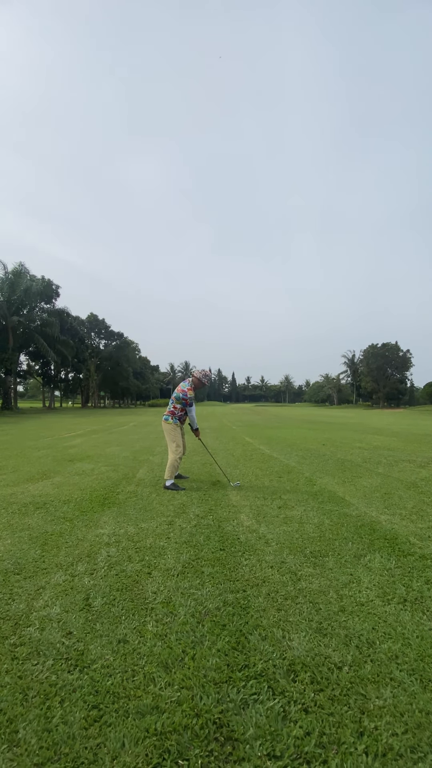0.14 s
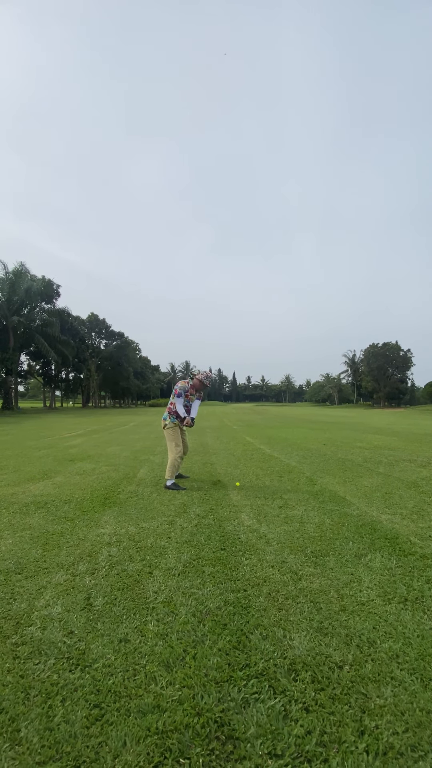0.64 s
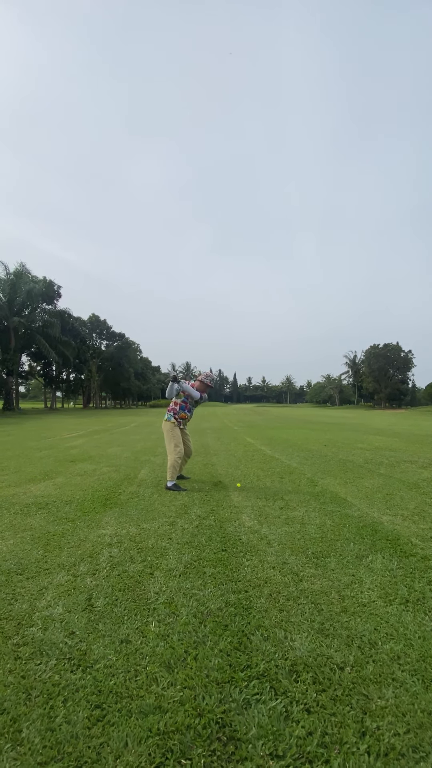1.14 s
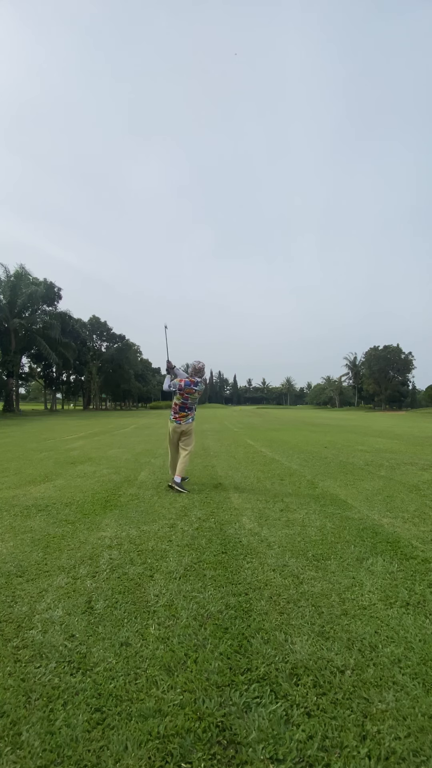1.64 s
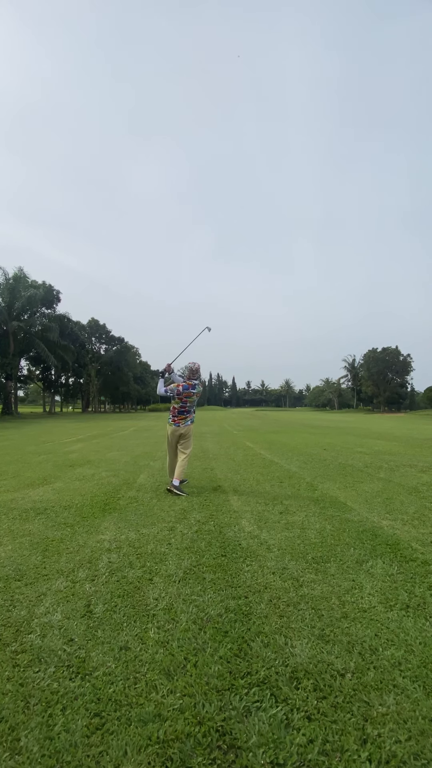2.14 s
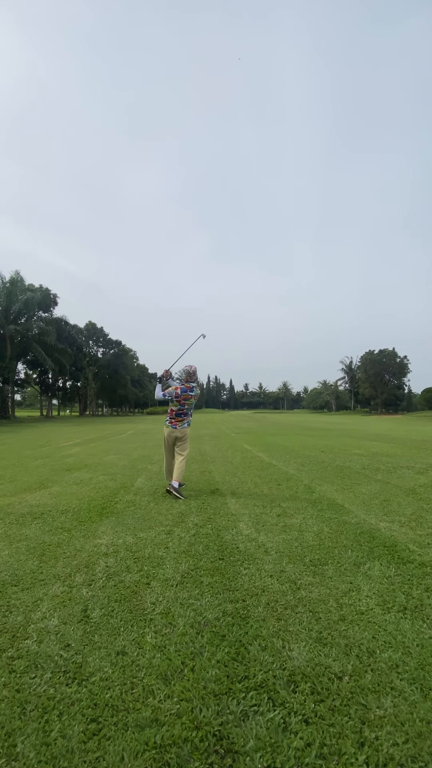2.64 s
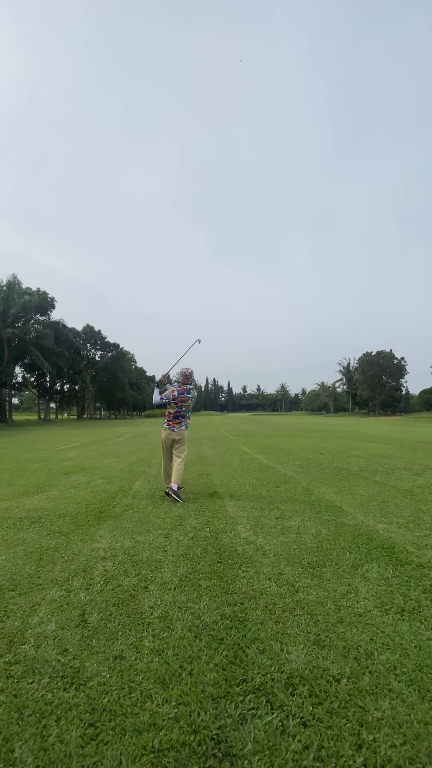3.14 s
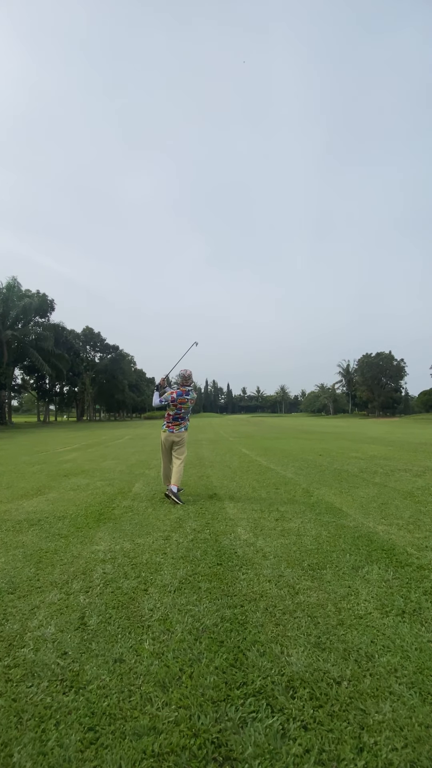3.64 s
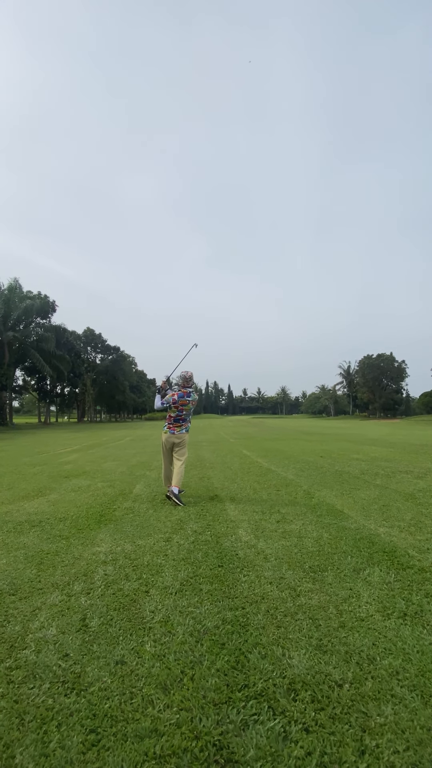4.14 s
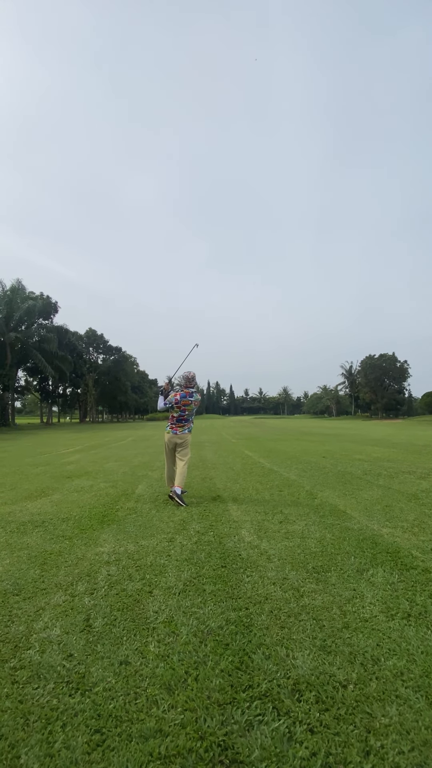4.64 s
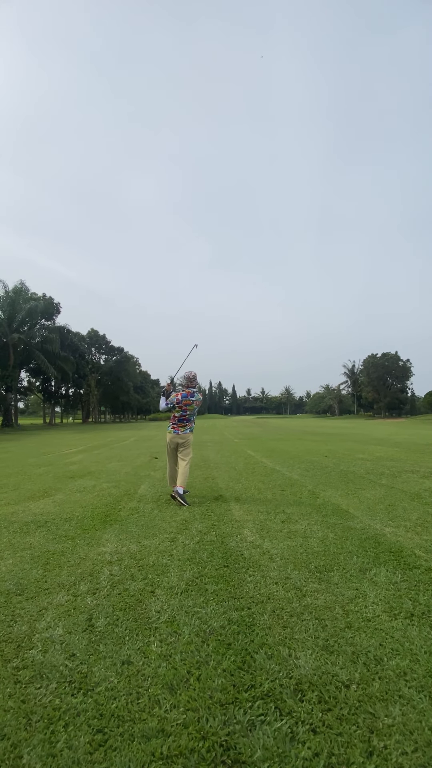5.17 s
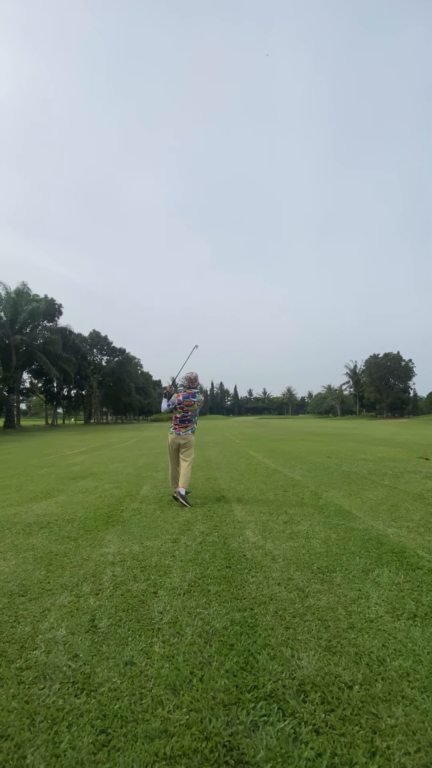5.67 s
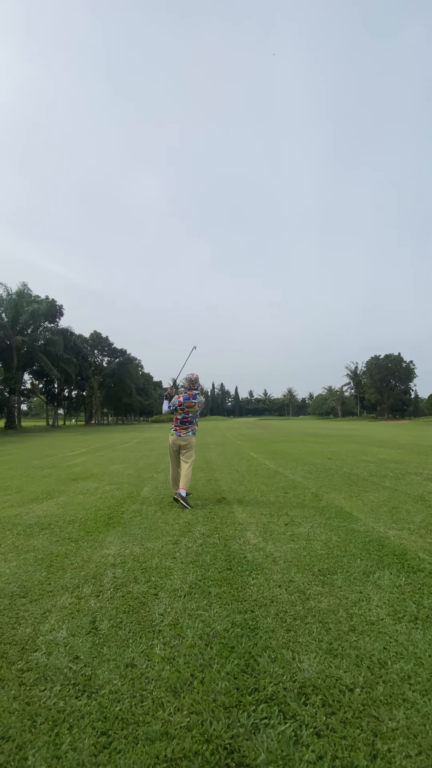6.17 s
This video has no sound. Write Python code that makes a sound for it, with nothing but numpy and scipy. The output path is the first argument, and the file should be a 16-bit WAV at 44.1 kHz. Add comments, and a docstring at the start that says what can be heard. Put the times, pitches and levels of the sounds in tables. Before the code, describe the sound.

On an open fairway, low rumble, distant engine drone and soft leaf and insect hiss run throughout, with tiny buzzy bird chips. At about 1.4 seconds a very brief swish ends in one sharp, loud iron strike on a ball with a crunch of tearing turf and a faint scattered return. Whistling birds answer on the right, then sparse peeps and chips continue. Stereo microphone some metres behind the golfer.

```python
"""An iron strikes a golf ball on an open fairway, some metres ahead of a two-port microphone:
clicks set the modes of club and ball ringing, and dense noise grains are the tearing turf.
Shaped noise makes the swish before the ball and the scattered return of turf spray and tree line.
Near-sine notes with noisy echoes are the strike's short ring and whistling, peeping and chipping birds.
Filtered noise gives leaf hiss, cicadas, crickets, a thin top hiss, far engine drone, rumble and road wash."""
import sys
import numpy as np
from scipy import signal
from scipy.fft import rfft, irfft, next_fast_len
from scipy.io import wavfile
from scipy.ndimage import uniform_filter1d, map_coordinates

SR = 44100
rng = np.random.default_rng(int(sys.argv[2]) if len(sys.argv) > 2 else 0)


def gain_from_db(level_db):
    """Turn a decibel level (scalar or array-like) into a linear amplitude factor."""
    decades = np.asarray(level_db, float) / 20
    return 10 ** decades


def persist_wave(psi):
    """Save psi, clipped to +-1, as 16-bit WAV."""
    counts = np.round(np.clip(psi, -1, 1) * 32767).astype(np.int16)
    wavfile.write(sys.argv[1], SR, np.atleast_2d(counts).T)


N = 277220   # samples
SIZE = next_fast_len(N + 8192)   # transform length, samples
FREQS = np.maximum(np.arange(SIZE // 2 + 1) * SR / SIZE, 1)   # Hz


# club contacts, grass tips, turf, ball (fourth row), rebounds: [t/s, relative level/dB, softness f/Hz]
IMPACTS = [(1.3950, -25, 8920), (1.401, -15.5, 493.3), (1.4017, -17.5, 6996), (1.4030, -7, 14000),
           (1.4039, -13.5, 2490), (1.4047, -14.5, 1502), (1.4071, -21.5, 9010), (1.4086, -27.5, 12010),
           (1.4112, -29, 13980)]


def contact_force():
    """Contact mechanics: a softer contact spreads its impulse into a slower exponential decay."""
    force = np.zeros(N) + 1e-18
    for s, db, soft_hz in IMPACTS:
        r = np.exp(-2 * np.pi * soft_hz / SR)
        at = round(s * SR)
        force[at:at + 200] += gain_from_db(db) * (1 - r) * r ** np.arange(200)
    return force


# modes of head, shaft and ball: [f/Hz, relative level/dB, 60 dB decay t/s]
CLUB_MODES = [(585, -21, 0.04), (820, -16, .04), (1150, -10.5, .018), (1630, -11, .014), (1950, -21, 0.022),
              (2470, -22.5, 0.013), (2950, -13, 0.018), (3950, -6, .012), (4250, -11, 0.014),
              (4638, -12.5, .013), (4920, -18, .03), (5400, -10, 0.012), (5970, -12.5, 0.0086),
              (7290, -8.5, .012), (8360, -10.5, 0.0053), (9300, -5.5, .008), (11200, -5, .008),
              (13900, -16, 0.0065)]
# sign of each mode; neighbours that move the same way leave a gap between them: [+1 or -1]
MODE_SIGNS = [1, 1, 1, 1, -1, -1, 1, 1, -1, 1, -1, 1, -1, 1, -1, 1, -1, 1]
# modes of the sole meeting the ground: [f/Hz, relative level/dB, 60 dB decay t/s]
GROUND_MODES = [(190, -27, .06), (325, -22.5, 0.065)]


def struck_bodies(force):
    """Modal synthesis: an impulse excites each damped mode, and the modes superpose."""
    out = gain_from_db(-5.5) * np.diff(force, prepend=0)   # direct click
    for (hz, db, t60), sign in zip(CLUB_MODES, MODE_SIGNS):
        out = out + sign * ring(force, hz, db, t60)
    # a small head radiates no bass
    out = signal.sosfilt(signal.butter(4, 450, "high", fs=SR, output="sos"), out)
    return out + sum(ring(force, hz, db, t60) for hz, db, t60 in GROUND_MODES)


# spectrum of tearing turf: [f/Hz, relative level/dB per Hz]
TURF_SPECTRUM = [(400, -23.5), (1200, -7.5), (2500, -9.5), (5000, -1), (6500, -10), (9500, 1.5),
                 (12500, -3.5), (15500, -5.5), (16800, -24.5)]


def turf_tear():
    """Granular noise: uneven random impulses, coloured, are gated by a brief swell; three spectra."""
    grain_db = 2.4 * rng.exponential(1, (3, SIZE))
    grains = rng.standard_normal((3, SIZE)) * gain_from_db(grain_db)
    coloured = irfft(rfft(grains) * colour(TURF_SPECTRUM), SIZE)[:, :N]
    coloured = np.array([rms_one(g) for g in coloured])
    envelope = gain_from_db(swell(top_s=1.4012, hold_s=.005, db=-20, rise_db=7000, fall_db=2000))
    return rfft(coloured * envelope, SIZE)


def strike():
    """Superposition: ringing bodies and tearing turf reach the ports from straight ahead."""
    bodies = struck_bodies(contact_force())
    tear = turf_tear()
    return ports(rfft(bodies, SIZE) + tear[0], AHEAD_PORTS, tear[1:])


# spectrum of swish and scatter before tilt: [f/Hz, relative level/dB per Hz]
SWING_SPECTRUM = [(250, -30), (400, 1.5), (1000, 3.5), (3000, 9), (5000, 5), (6300, 5.5), (8000, -2),
                  (8900, -16), (11500, -18), (13500, -10), (16000, -22)]


def swing():
    """Aerodynamic noise and diffuse scattering: a brightening swish, then lumpy noise, band by band."""
    # air round the shaft, at full level just before the ball
    swish_start_s, swish_hold_s = 1.358, .042
    swish_db = swell(swish_start_s, swish_hold_s, db=-43, rise_db=300, fall_db=450)
    # turf spray and the tree line's return
    scatter_db = swell(top_s=1.50, hold_s=.11, db=-54.5, rise_db=110, fall_db=75)
    # dB per octave about 700 Hz: -4.3 as the hold ends, growing by 60 each second within the limits
    since_hold_s = np.arange(N) / SR - swish_start_s - swish_hold_s
    swish_tilt = np.clip(-4.3 + 60 * since_hold_s, -12, 0)
    scatter_tilt, patchy_db = -0.66, 2.8   # dB per octave; spread of the lumps, dB
    air = rfft(diffuse(colour(SWING_SPECTRUM), AHEAD_PORTS), SIZE)
    spray = rfft(diffuse(colour(SWING_SPECTRUM)), SIZE)
    edges_hz = [200, 700, 1400, 2400, 3600, 5200, 7000, 10000, 17000]
    out = 0
    for low, high in zip(edges_hz, edges_hz[1:]):
        band = (FREQS >= low) * (FREQS < high)
        octaves = np.log2(np.sqrt(low * high) / 700)
        air_band = irfft(air * band, SIZE)[:, :N]
        out = out + air_band * gain_from_db(swish_db + swish_tilt * octaves)
        lumps_db = patchy_db * drift(45)
        spray_band = irfft(spray * band, SIZE)[:, :N]
        out = out + spray_band * gain_from_db(scatter_db + scatter_tilt * (octaves - 0.5) + lumps_db)
    return out


# whistled notes, one row a note; the first row is the strike's short ring near 2.8 kHz:
# [level before port gains/dB, pitch line of (t/s, f/Hz)]
WHISTLE_NOTES = [ (-62, [(1.412, 2830), (1.435, 2870)]), (-62, [(1.443, 3780), (1.455, 3700),
                 (1.47, 3320)]), (-57.5, [(1.48, 2780), (1.515, 2780)]), (-64, [(1.525, 2880),
                 (1.545, 2400)]), (-53.5, [(1.708, 2870), (1.722, 3140), (1.735, 3060), (1.742, 3320),
                 (1.764, 3230)]), (-58.5, [(1.805, 3880), (1.815, 3970), (1.83, 3230), (1.841, 3150)]),
                 (-56.5, [(1.845, 2940), (1.875, 2835), (1.89, 3070), (1.912, 2470)]), (-65, [(2.005, 3320),
                 (2.03, 3390), (2.047, 3640)]), (-68, [(2.03, 3850), (2.058, 3920)]), (-57, [(2.098, 2780),
                 (2.115, 2886), (2.135, 2940), (2.15, 3400), (2.165, 3010), (2.183, 2745), (2.195, 3100),
                 (2.213, 2970)]), (-74.5, [(2.99, 2990), (3.005, 3500), (3.04, 3400)]),
                 (-74.5, [(3.055, 3300), (3.08, 2900), (3.105, 2700)]), (-70.5, [(3.085, 3410),
                 (3.13, 3380)]), (-74.5, [(3.115, 2720), (3.165, 2700)]), (-71, [(3.29, 2830),
                 (3.335, 3140)]), (-76, [(3.285, 4130), (3.33, 4070)]), (-77, [(3.36, 3420), (3.41, 3200)]),
                 (-68.5, [(3.40, 2700), (3.46, 2720)]), (-75.5, [(3.66, 4150), (3.69, 3940)]),
                 (-76.5, [(3.75, 3910), (3.79, 3300)]), (-80, [(3.335, 3930), (3.38, 3480)]),
                 (-80.5, [(3.74, 6350), (3.85, 5950)]), (-72, [(4.638, 4650), (4.668, 3840)]),
                 (-69.5, [(4.718, 3110), (4.728, 3470), (4.748, 3750), (4.76, 3670)]),
                 (-66.5, [(4.762, 4255), (4.795, 3570)]), (-72, [(4.797, 3710), (4.815, 3770),
                 (4.835, 3550)]), (-77, [(5.625, 4750), (5.665, 3850)]), (-72, [(5.755, 3630), (5.77, 3370),
                 (5.782, 3530)]), (-81, [(5.78, 4030), (5.812, 4120)]), (-86, [(5.795, 6250), (5.83, 6450),
                 (5.85, 6400)]), (-74.5, [(6.105, 3100), (6.13, 2640)]), (-87, [(5.94, 6290), (5.97, 6140),
                 (6.04, 5980)]), (-74.5, [(6.25, 3790), (6.282, 3900)]), ]


def whistles():
    """Frequency modulation: gliding near-sines from the right, wetter and rougher when faint."""
    near_db = -55.5   # reference level for echo and roughness
    direct, sent = np.zeros((2, N))
    for db, line in WHISTLE_NOTES:
        s = np.linspace(line[0][0], line[-1][0], num=60)
        hz = np.interp(s, *np.transpose(line))
        level_db = db - np.linspace(-1.4, 1, num=60) ** 4   # softer at its ends, softest at its start, loudest a little past the middle
        fainter_db = near_db - db
        note = np.zeros(N)
        add(note, np.transpose([s, hz, level_db]), rough=min(2 + .3 * fainter_db, 4.5))
        direct += note
        sent += note * gain_from_db(min(.75 * fainter_db, 12))
    return direct * gain_from_db([[-8.0], [2.5]]) + echoes(sent, wet_db=-13, t60=0.25)


# arched peeps: [t of the top/s, top f/Hz, top level before flutter and port gains/dB]
PEEP_NOTES = [(.385, 5660, -69.5), (3.205, 5530, -71), (4.148, 5780, -64), (5.18, 5700, -74),
              (6.114, 5530, -70)]


def peeps():
    """Frequency modulation: pitch and level follow a parabolic arch."""
    half_s, sag, edge_db = .019, .11, 1   # half length, share of pitch and level lost at both ends
    calls = np.zeros(N)
    arch = np.linspace(-1, 1, num=30)
    for s, hz, db in PEEP_NOTES:
        rows = [s + half_s * arch, hz * (1 - sag * arch ** 2), db - edge_db * arch ** 2]
        add(calls, np.transpose(rows), rough=1.7)
    return ports(rfft(calls, SIZE), AHEAD_PORTS) + echoes(calls, wet_db=-13, t60=.15)


# buzzy chips, each begun 6 ms before its time: [t/s, reference level before the envelope/dB]
CHIP_NOTES = [(0.0094, -63), (0.084, -59.5), (0.3093, -62), (0.3596, -63.5), (0.655, -59), (0.838, -56.5),
              (1.037, -62), (1.8386, -64), (2.3072, -65), (2.688, -55.5), (2.8945, -63), (3.0285, -64),
              (3.3603, -64), (4.2194, -71), (4.5083, -70), (4.596, -57), (4.874, -61.5), (5.116, -59.5),
              (5.333, -63.5), (5.4974, -66), (5.6894, -67), (6.1823, -69)]


def chips():
    """Fast frequency modulation: an uneven trill swings the pitch as the chip rises."""
    calls = np.zeros(N)
    steps = np.linspace(0, 1, 120)
    chances = rng.random((len(CHIP_NOTES), 5))
    for (s, db), (speed, turn, long, high, top) in zip(CHIP_NOTES, chances):
        length_s = .028 * (1 + .3 * (2 * long - 1))
        trill_hz = 260 * (.9 + 0.17 * speed)
        uneven = .5 * smooth_chance(size=12)[:120]   # rad
        trill = np.sin(2 * np.pi * (trill_hz * length_s * steps + turn) + uneven)
        middle_hz = 6700 + 250 * (2 * high - 1)
        hz = middle_hz + 950 * trill + 700 * (steps - .5)
        # the upper turn of the trill is louder by this much, the lower one softer
        top_db = np.interp(top, [0, 1], (2.0, 6.0))
        level_db = db - 8 + top_db * trill - 25 * (steps - .45) ** 2
        add(calls, np.transpose([s - .006 + length_s * steps, hz, level_db]), rough=4.0)
    return ports(rfft(calls, SIZE), AHEAD_PORTS) + echoes(calls, wet_db=-6, t60=.22)


# spectrum of leaf hiss: [f/Hz, relative level/dB per Hz]
LEAF_SPECTRUM = [(1000, -29.5), (1700, -1), (2150, -0.5), (2530, 1.5), (4220, -6.5), (5990, -11),
                 (7720, -18), (8210, -17), (8800, -7.5), (11400, -35), (19400, -120)]


def leaves():
    """Broadband noise: steady leaf hiss, raised once by a far twitter of birds."""
    twitter_db = swell(top_s=3.7, hold_s=0.078, db=2.5, rise_db=9, fall_db=4.7)
    return wavering(LEAF_SPECTRUM, -66.5 + np.maximum(twitter_db, 0), flicker_db=0.45)


# spectrum of cicadas: [f/Hz, relative level/dB per Hz]
CICADA_SPECTRUM = [(4880, -41.5), (8300, -13.5), (9060, 2), (9590, -0.5), (10300, 3), (11000, -24),
                   (14300, -53), (22000, -120)]


def cicadas():
    """Band-shaped noise: a chorus is heard as a high band that wavers."""
    return wavering(CICADA_SPECTRUM, -68, flicker_db=0.91)


def crickets():
    """Resonance: a broad resonance blurs noise into a steady band."""
    return resonant_noise(2520, width=440, db=-77.5)


# spectrum of the thin top hiss: [f/Hz, relative level/dB per Hz]
TOP_SPECTRUM = [(10000, -27.5), (11000, 2.5), (13000, -6.5), (15000, -16), (16000, -42)]


def top_hiss():
    """Band-shaped noise: a thin top band flickers strongly and fades away late."""
    return wavering(TOP_SPECTRUM, swell(top_s=0, hold_s=4.5, db=-82, rise_db=60, fall_db=24), flicker_db=7.1)


# wavering partials of a far engine: [f/Hz, half-gain width f/Hz, rms level/dB]
ENGINE_PARTIALS = [(69.47, 2.6, -47), (135.9, 3.9, -52), (220.4, 18, -62)]


def engine():
    """Resonance: noise through narrow resonances gives tones that swell and waver."""
    return sum(resonant_noise(hz, width, db) for hz, width, db in ENGINE_PARTIALS)


# levels of the low rumble and road wash, which waver at random:
# [t/s, rumble level before flicker/dB, road wash level before flicker/dB]
ROAD_LEVELS = [(0.0, -42, -58), (0.44, -42, -59), (0.68, -47.5, -60.5), (1.4, -38.5, -58), (1.84, -41, -60),
               (2.78, -41, -57), (3.45, -42, -55), (3.8, -44, -59.5), (4.31, -40.5, -57),
               (4.97, -41, -56.5), (5.3, -45, -59.5), (5.78, -42.5, -58.5), (6.29, -46.5, -60)]
# spectrum of the rumble: [f/Hz, relative level/dB per Hz]
RUMBLE_SPECTRUM = [(15, -58.5), (25, -27), (38, -21), (41, -9.5), (53, -6.5), (74, -2), (135, -4.5),
                   (201, -11.5), (226, -13.5), (330, -27.5), (430, -56.5), (730, -120)]
# spectrum of the road wash: [f/Hz, relative level/dB per Hz]
WASH_SPECTRUM = [(160, -33), (280, -16.5), (355, -9.5), (592, -9), (857, -8.5), (1340, -13), (2000, -29.5),
                 (2600, -52.5), (4400, -120)]


def rumble_and_wash():
    """Broadband noise: low rumble and road wash, whose levels waver at random."""
    rumble_db, wash_db = in_time(ROAD_LEVELS)
    rumble = wavering(RUMBLE_SPECTRUM, rumble_db, flicker_db=1.3)
    return rumble + wavering(WASH_SPECTRUM, wash_db, flicker_db=0.61)


def ring(force, hz, db, t60):
    """Damped harmonic oscillator: a two-pole resonator driven by the force."""
    r, w = gain_from_db(-60 / (t60 * SR)), 2 * np.pi * hz / SR
    return signal.lfilter([0, gain_from_db(db) * np.sin(w)], [1, -2 * r * np.cos(w), r * r], force)


def add(out, rows, rough):
    """Phase integration: adds a near-sine along rows of (t/s, f/Hz, level/dB), soft at both ends."""
    s, hz, db = np.transpose(rows)
    at = np.arange(round(s[0] * SR), min(round(s[-1] * SR), N))
    ends = np.minimum(1, np.minimum(at - at[0], at[-1] - at) / (0.0057 * SR))
    wobble = smooth_chance(size=150)[:len(at)] * .12 * rough   # rad
    flutter_db = smooth_chance(size=130)[:len(at)] * rough   # moving air breaks the note up
    phase = 2 * np.pi * np.cumsum(np.interp(at / SR, s, hz)) / SR + wobble
    level = gain_from_db(np.interp(at / SR, s, db) + flutter_db)
    out[at] += np.sqrt(2) * ends * level * np.sin(phase)


def echoes(x, wet_db, t60):
    """Multiple scattering: trees turn a call into a short noisy tail, unlike on each side."""
    t = np.arange(SR // 2) / SR
    tail = rng.standard_normal((2, len(t))) * gain_from_db(-60 * t / t60) * (t > .006)
    tail = rms_one(tail) / np.sqrt(len(t))
    return gain_from_db(wet_db) * signal.fftconvolve(x[None], tail, axes=1)[:, :N]


def wavering(spectrum, level_db, flicker_db):
    """Amplitude modulation: diffuse coloured noise whose level drifts at random."""
    return gain_from_db(level_db + flicker_db * drift(9)) * diffuse(colour(spectrum))


def resonant_noise(hz, width, db):
    """Resonance: diffuse noise weighted by a bell that halves the gain at half a width from its centre."""
    return gain_from_db(db) * diffuse(1 / (1 + (2 * (FREQS - hz) / width) ** 2))


def swell(top_s, hold_s, db, rise_db, fall_db):
    """Exponential envelope: the level in dB climbs, holds and falls, with slopes in dB per s."""
    t = np.arange(N) / SR
    return db - rise_db * np.maximum(top_s - t, 0) - fall_db * np.maximum(t - top_s - hold_s, 0)


def drift(rate):
    """Random modulation: a smooth curve through unit-spread normal knots, rate knots per s."""
    knots = rng.standard_normal(400)
    return map_coordinates(knots, [np.minimum(np.arange(N) / SR * rate, 398)], order=3)


def smooth_chance(size):
    """Low-pass randomness: noise averaged twice over size samples, scaled to rms 1."""
    once = uniform_filter1d(rng.standard_normal(8000), size=size)
    return rms_one(uniform_filter1d(once, size=size))


def rms_one(x):
    """Power normalisation: scales to unit mean square."""
    return x / np.sqrt(np.mean(x ** 2) + 1e-20)


def in_time(rows):
    """Linear interpolation: the columns of a table, sample by sample."""
    s, *columns = np.transpose(rows)
    return [np.interp(np.arange(N) / SR, s, c) for c in columns]


def in_pitch(rows):
    """Interpolation on a logarithmic axis: the columns of a table, frequency by frequency."""
    hz, *columns = np.transpose(rows)
    return [np.interp(np.log(FREQS), np.log(hz), c) for c in columns]


def colour(spectrum):
    """Spectral shaping: the gain of a spectrum, silent outside it."""
    inside = (FREQS > spectrum[0][0]) * (FREQS < spectrum[-1][0])
    return gain_from_db(in_pitch(spectrum)[0]) * inside


# the ports for sound from all around: [f/Hz, likeness 0-1, lead of the right/rad, left-right level/dB]
AROUND_PORTS = [(100, .99, 0, .5), (250, .98, .1, 1.4), (400, .6, .3, .4), (600, .35, 1.5, -.4),
                (900, .54, 1.8, -2.9), (1300, .61, 3.1, -4.2), (1900, .4, 5.3, -4.1), (2300, .2, 3.8, -5.1),
                (3200, .37, 3.9, -3.5), (4300, .5, 5.0, -3.5), (4900, .83, 3.2, -1.1),
                (6200, .5, 4.3, -2.2), (7600, .63, 4.5, .4), (8500, .96, 3.2, .1), (9500, .99, 3.14, 0),
                (12000, .99, 3.14, 0), (13500, .7, 2.9, 0), (15000, .2, .7, .3)]
# the ports for the golfer straight ahead: [f/Hz, likeness 0-1, lead of the right/rad, left-right level/dB]
AHEAD_PORTS = [(300, 1, .1, 2.5), (600, .99, .3, 4.1), (1200, .96, .7, 4.6), (1600, .98, 0, -1.4),
               (2400, .92, -.6, -2.7), (3000, .97, .2, -5.6), (4400, .89, 0, -5.5), (4900, .85, 3.2, -4.7),
               (6200, .8, 4.3, -4.1), (7600, .84, 4.9, 0), (8600, .91, 3.7, 2.7), (10000, .95, 3.2, 1.1),
               (12000, .89, 2.4, .8), (15000, .77, 1.2, 0)]


def diffuse(gain, table=AROUND_PORTS):
    """Diffuse field: three independent noises, coloured and partly shared by the ports; rms 1."""
    noise = rfft(rng.standard_normal((3, SIZE))) * gain
    return rms_one(ports(noise[0], table, noise[1:]))


def ports(shared, table, own=0):
    """Interchannel coherence: the shared part has a phase and level step, the rest differs by port."""
    alike, lead, balance_db = in_pitch(table)
    alike = np.clip(alike, 0, 1)
    side = np.array([[-.5], [.5]])
    both = np.sqrt(alike) * shared * np.exp(1j * side * lead) + np.sqrt(1 - alike) * own
    return irfft(both * gain_from_db(-side * balance_db), SIZE)[:, :N]


def scene():
    """Superposition: all sources add at the two ports."""
    calls = whistles() + peeps() + chips()
    air = leaves() + cicadas() + crickets() + top_hiss()
    return strike() + swing() + calls + air + engine() + rumble_and_wash()


def top_cut(x):
    """Nothing passes above the cut-off."""
    return signal.sosfilt(signal.butter(12, 16670, fs=SR, output="sos"), x)


def record(dry):
    """Low-pass filtering: the top is cut, 70 dB down from 16500 Hz."""
    low_pass = signal.cheby2(12, 70, 16500, fs=SR, output="sos")
    mix = signal.sosfilt(low_pass, dry)
    return top_cut(mix)


dry = scene()
out = record(dry)
persist_wave(out)
```